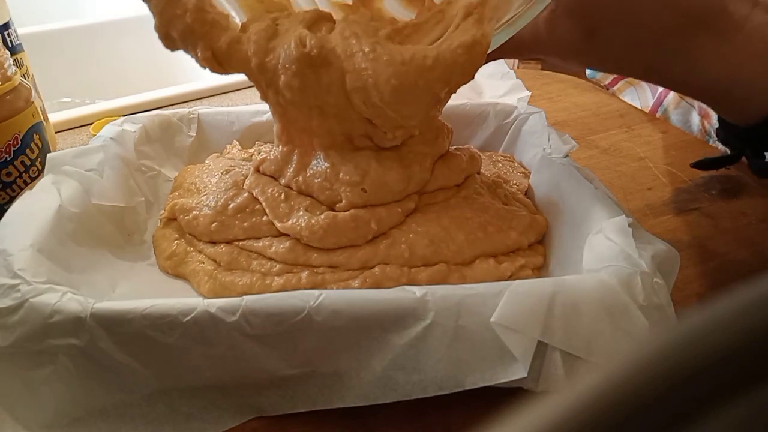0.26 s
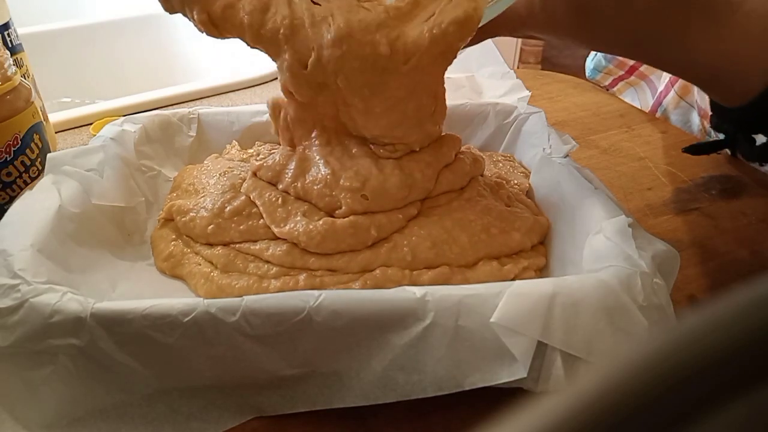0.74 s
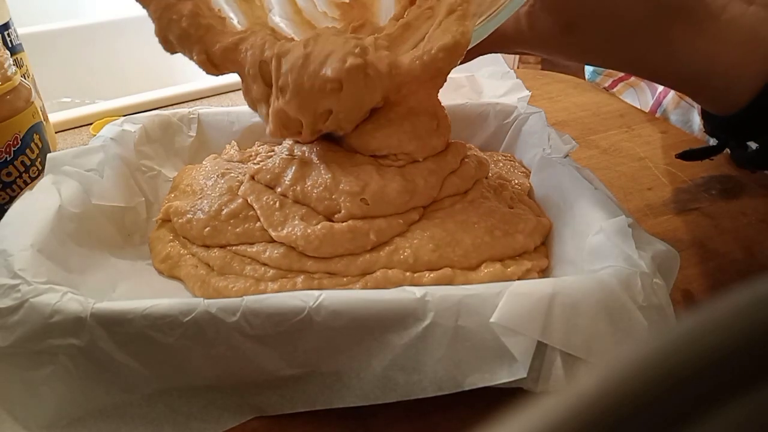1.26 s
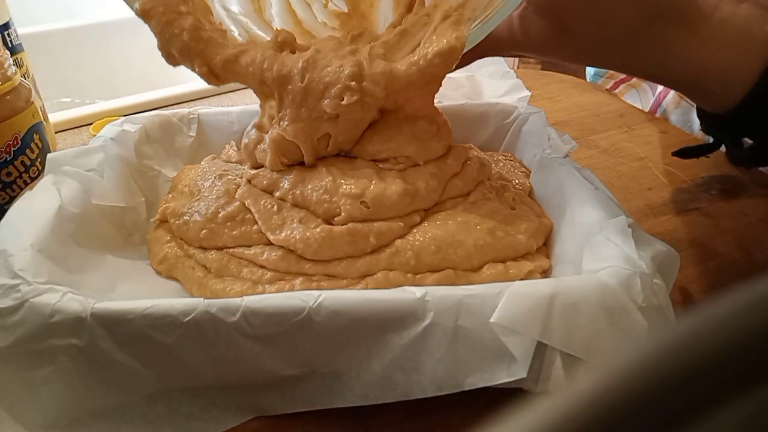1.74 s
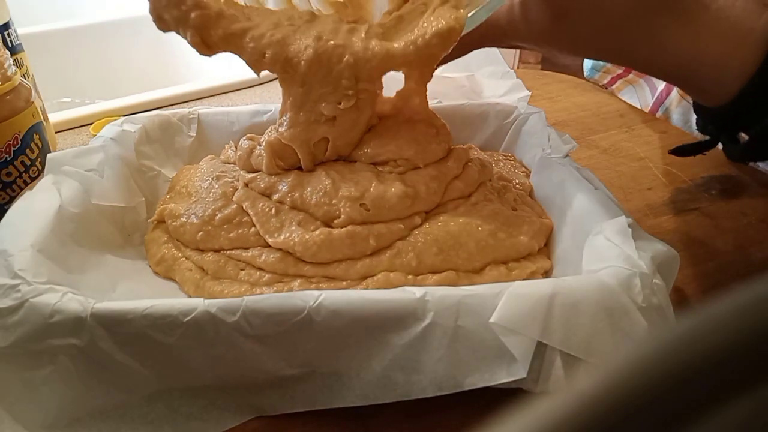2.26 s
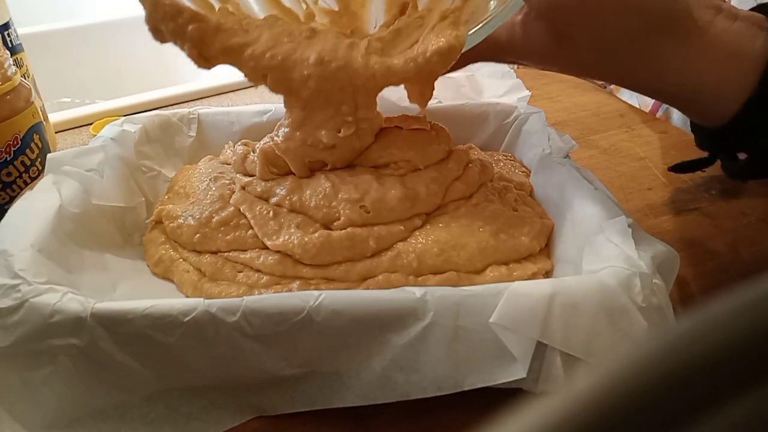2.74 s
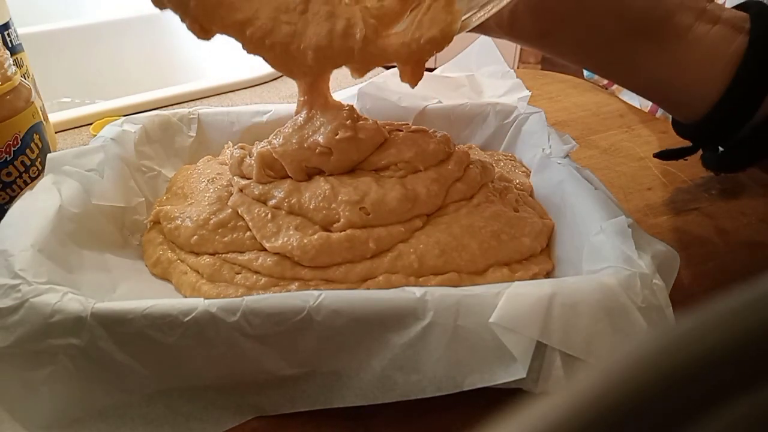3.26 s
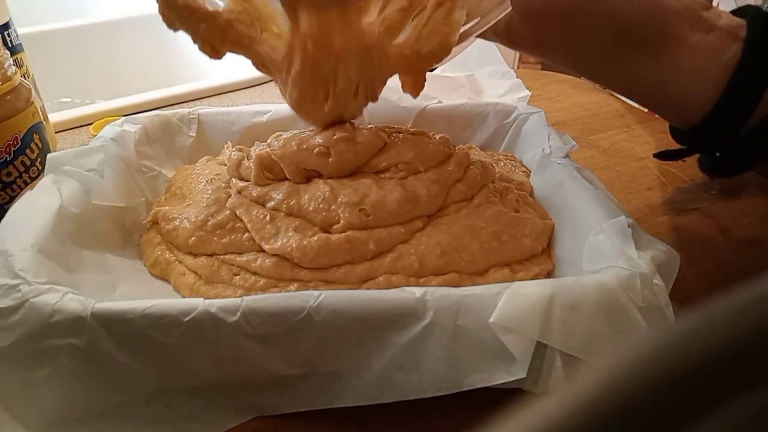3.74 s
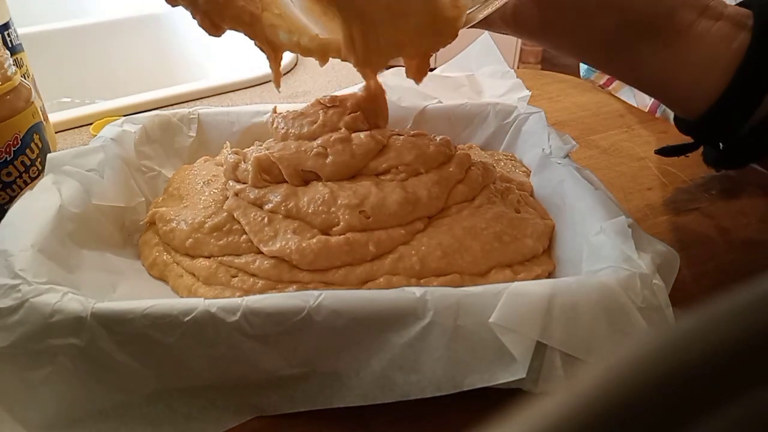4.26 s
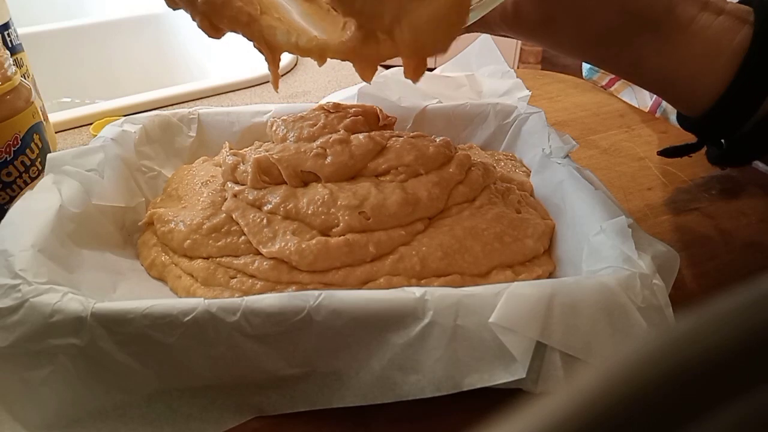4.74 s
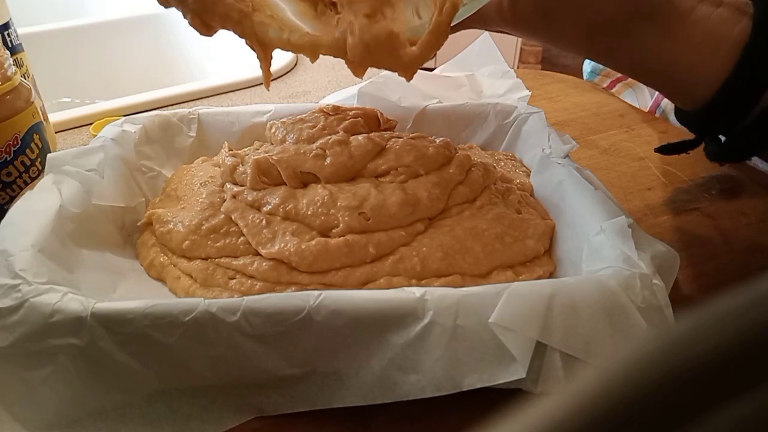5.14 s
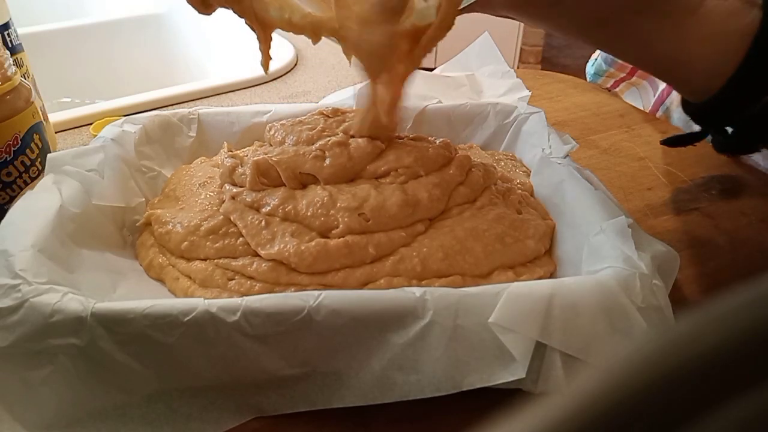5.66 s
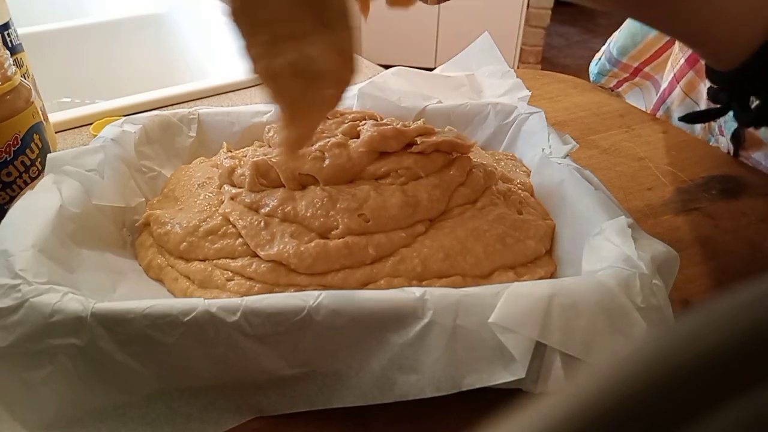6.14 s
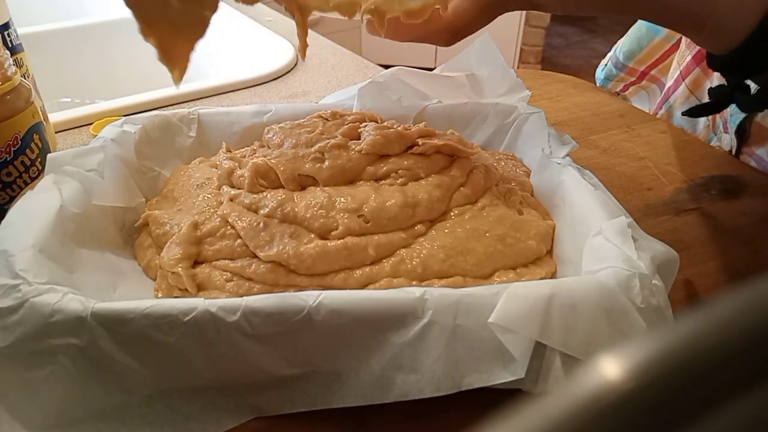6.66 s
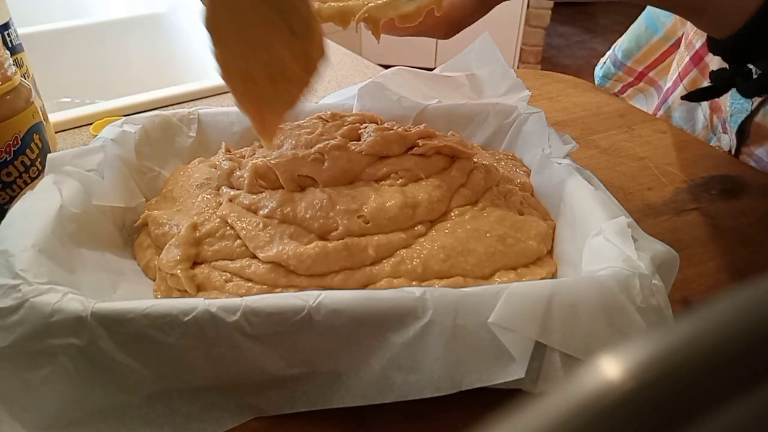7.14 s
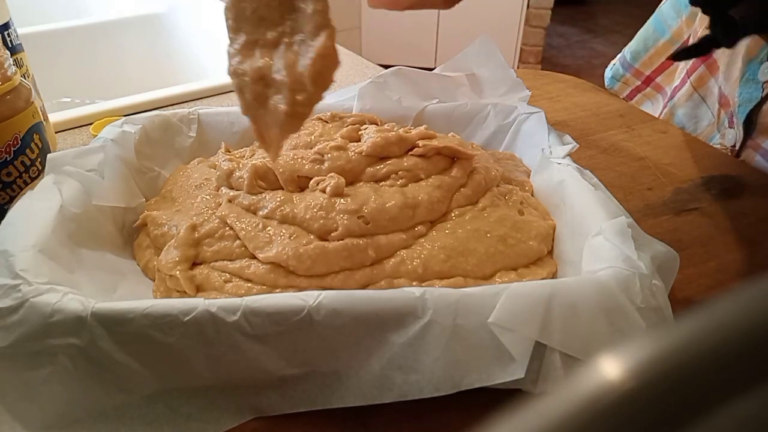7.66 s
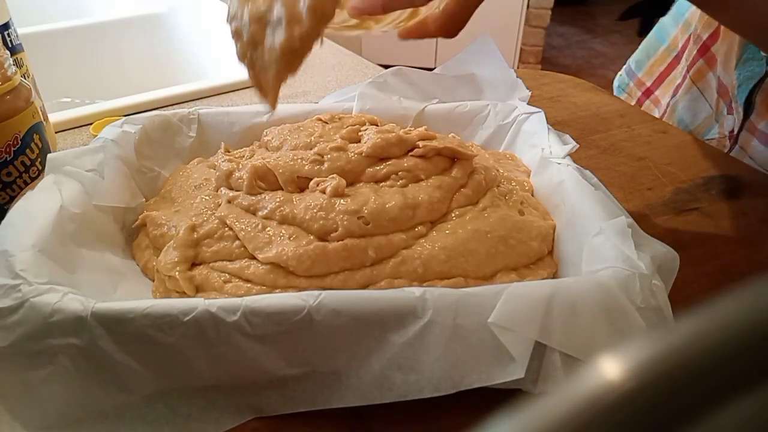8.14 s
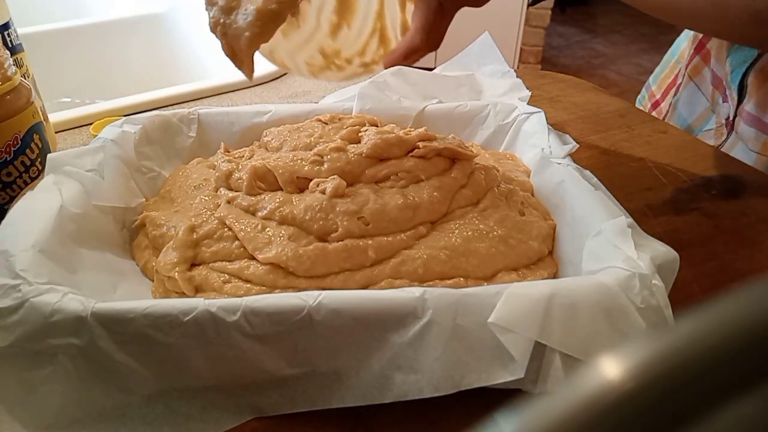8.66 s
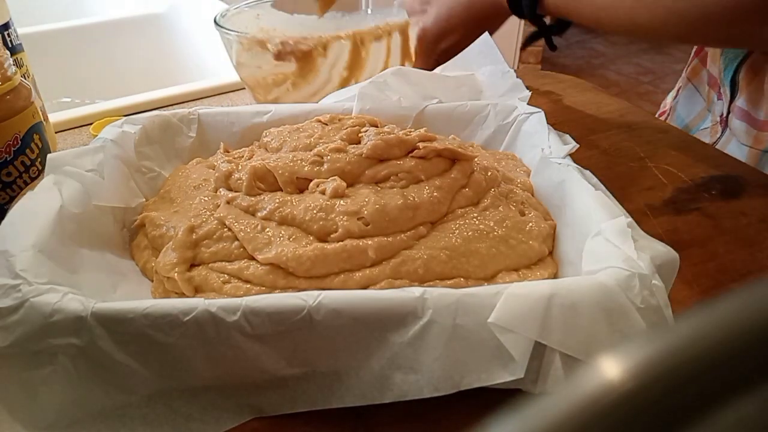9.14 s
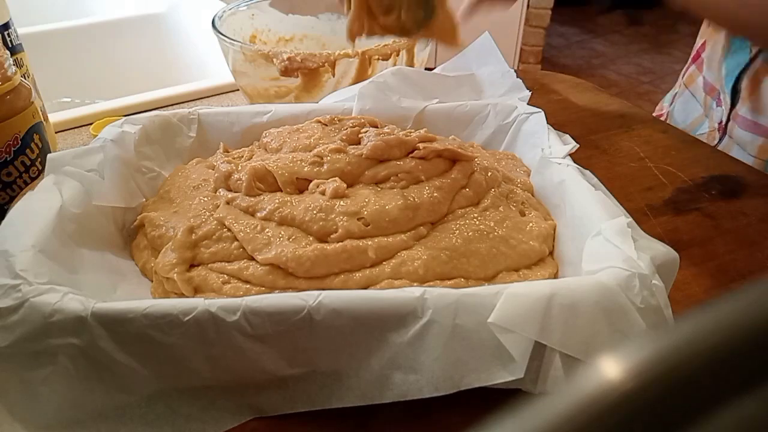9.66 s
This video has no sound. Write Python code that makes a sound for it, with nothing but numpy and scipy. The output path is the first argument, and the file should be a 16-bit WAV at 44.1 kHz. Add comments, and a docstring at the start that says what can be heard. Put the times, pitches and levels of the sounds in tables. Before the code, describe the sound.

A small kitchen heard very close, with quiet air and a faint wavering hum. For the first 2.3 seconds there are only barely audible taps, soft sliding batter, brief wet smears and small ticks of bursting air pockets. A bright wet tick comes at 2.5, then sharp spatula clicks on glass at 2.8 and 3.0, their ringing short and damped by batter. More firm clacks follow at 3.7, 4.0, 4.3 and 4.6, the strongest and brightest at 5.1, with short squelches and tiny squeaks between. Another click sounds at 6.0, then fingers rub the glass softly around 6.3. Faint dull taps and a smear come near 7.0, then near quiet. At 9.1 the bowl lands on a wooden table with a loud, low thud and brief roll; weaker knocks at 9.3 to 9.4 and a tiny one at 9.5 settle it, before a barely audible rustle at 9.7.

```python
"""First a faint appliance hum and softly sliding batter; then a spatula clicks on the glass bowl held in one hand.
It scrapes thick batter into a paper-lined pan: clicks are filtered noise plus the bowl's short, damped ringing.
Between them the batter smears, squelches and crackles, made of random pops and small squeaks, and air pockets tick.
The fingers shift their grip; the bowl is set down on a wooden table and rocks to rest: thuds, rolling noise, a rustle.
Echoes of a small kitchen surround these sounds; still air is quiet noise and the hum is wavering sine tones."""
import sys
import numpy as np
from scipy import signal
from scipy.fft import rfft, irfft, next_fast_len
from scipy.io import wavfile
from scipy.ndimage import uniform_filter1d, map_coordinates

SR = 44100
rng = np.random.default_rng(int(sys.argv[2]) if len(sys.argv) > 2 else 0)


def log_audio(samples):
    """Write samples as a 16-bit WAV file to the path given in sys.argv[1]."""
    # one column per channel
    frames = np.atleast_2d(samples).T
    # limit to full scale, then quantise
    limited = np.clip(frames, -1, 1)
    pcm = np.round(limited * 32767).astype(np.int16)
    wavfile.write(sys.argv[1], SR, pcm)


N = 436590  # length in samples

# Spatula hits on the glass: t/s, level/dB, bite over body level/dB, place (0 rim - 1 wall), favoured mode f/Hz
CONTACTS = [(0.2906, -52, -13, 0.019, 590), (0.3657, -53.5, -16, 0, 590), (0.769, -45, -3, 0.16, 3530),
            (1.4861, -51.5, -2.5, 0.11, 1370), (1.9203, -51, 2, 0.5, 2900), (2.4266, -43.5, -4, 0.057, 590),
            (2.5077, -49, 8, 0.0033, 3500), (2.7715, -22, -0.5, 0.0, 3600), (2.8564, -35, -9.5, 0.03, 600),
            (2.9581, -24, -0.5, 0.072, 6930), (3.352, -55.5, -1, 0.03, 591), (3.7261, -28, 9, 0.77, 1950),
            (4.0392, -27.5, 0.5, 0.067, 594), (4.2774, -26, 3.5, 0.9, 1100), (4.578, -26, -1, 0.08, 595),
            (5.1382, -19.5, 7, 0.5, 3380), (6.01, -28.5, 0.5, 0.62, 1370), (6.9602, -42, -14.5, 0.75, 1085),
            (7.0247, -52.5, -13, 0.47, 1085)]
# Bands of a click, in the order knock, body, bite, shine: lowest f/Hz, highest f/Hz
CLICK_BANDS = [(90, 350), (400, 1600), (1600, 4500), (5000, 15000)]
# Ringing modes of the coated bowl with the spatula against it: f/Hz, t60/s, rim level/dB, wall level/dB
BOWL_MODES = [(135.76, 0.074, -8.5, -22.5), (193, 0.078, -6, -16.5), (481, 0.042, -3.5, -3.5),
              (591, 0.14, -10.5, -21), (620, 0.019, 4.5, -9.5), (719, 0.046, -10.5, -9),
              (909, 0.039, -6, -11), (1089, 0.069, -9.5, 1.5), (1280, 0.027, -5, -14),
              (1384, .04, -8.5, -2), (1480, 0.018, -2, -15.5), (1925, 0.06, -14.5, 3.5),
              (2260, 0.027, -8, -13), (2820, 0.023, -7.5, -6.5), (2982, 0.041, -13.5, -1),
              (3227, 0.021, 3, -0.5), (3405, 0.029, 0.5, -0.5), (3580, .025, -1, -8.5),
              (3748, 0.056, -16, -14.5), (4344, 0.036, -13, -20), (5760, .04, -24, -10.5),
              (6530, 0.017, -9.5, -29), (6900, 0.035, -4.5, -22.5), (7690, 0.034, -17.5, -11.5),
              (7800, 0.019, -18, -16), (9280, 0.019, -18.5, -32.5)]
# Colour of the dry crack of a contact: f/Hz, level/dB per Hz
CRACK_COLOUR = [(50, -25.5), (150, -9), (320, -20.5), (550, -1.5), (1400, 3), (1750, -1.5), (3300, 5.5),
                (4900, -12), (7000, -1.5), (9500, -12.5), (12000, -17), (15500, -18.5)]
# Larger air pockets bursting in the batter: t/s, peak level/dB, tilt/dB per octave
POCKETS = [(0.7414, -35, 0), (0.8567, -38.5, -1.5), (0.9407, -26.5, -3), (1.8441, -35, -7.5),
           (2.0223, -36.5, 0), (2.3499, -26, 1.5), (2.474, -18.5, 4.5), (3.1534, -42, -4), (3.195, -32, 0),
           (3.3496, -35, 4.5), (3.449, -38, -4), (5.5566, -40, 0), (5.5637, -37.5, -1.5), (6.7051, -37, -3)]
# Colour of such a burst: f/Hz, level/dB per Hz
BURST_COLOUR = [(100, -18), (700, -19.5), (1700, -2), (3300, 7), (4900, -13), (7000, -1.5), (9500, -13.5),
                (12000, -19.5), (15500, -10.5)]
# Dull, low bumps under two of the clicks: t/s, level/dB before the soft start
BUMPS = [(2.429, -38.5), (3.352, -37.5)]
# Wet strokes of the blade, and at the end a faint rustle of handling:
# start t/s, length/s, squelch level/dB before trim, crackle over squelch level/dB before trim
STROKES = [(0.298, 0.033, -60, -0.5), (0.344, 0.12, -59.5, -6), (0.89, 0.15, -62, -3.5),
           (1.038, 0.055, -51, -19), (1.508, 0.15, -57.5, -12.5), (2.039, .065, -43, -14.5),
           (2.317, 0.02, -52.5, -13), (3.381, 0.14, -56, -10.5), (3.649, 0.12, -50, -25),
           (4.159, 0.037, -60.5, 5.5), (4.234, 0.049, -45, -19), (4.785, 0.064, -42, -24.5),
           (5.307, 0.044, -42, -20), (7.028, 0.16, -58.5, -8), (9.69, 0.21, -76, 0.5)]
# Resonances of the bowl under the moving blade: f/Hz, width/Hz, level/dB
SQUELCH_MODES = [(1140, 88, -4.5), (1330, 210, -2), (1890, 160, -0.5), (2340, 57, -9), (2850, 180, -4.5),
                 (3370, 160, -2.5), (3920, 320, -9.5)]
# Colour of the crackling batter: f/Hz, level/dB per Hz
CRACKLE_COLOUR = [(2000, -27.5), (5000, -12), (7200, 5.5), (9500, -11.5), (12000, -19), (15500, -25.5)]
# How hard the hands work the bowl: t/s, level/dB
EFFORT = [(0, -65), (1.1, -61), (1.35, -68), (2.5, -60.5), (3.3, -64.5), (5.05, -62), (5.8, -71),
          (6.25, -59.5), (7.3, -68), (7.7, -73), (8.7, -75.5), (9.0, -67.5), (9.85, -64.5)]
# Colour of the sliding batter: f/Hz, level/dB per Hz
SMEAR_COLOUR = [(150, -12), (300, 0.5), (500, 5), (750, 11), (1000, 4.5), (1600, -6.5), (2500, -13),
                (3400, -11.5), (5000, -33.5), (7200, -40.5), (10000, -34.5), (15500, -33)]
# Colour of the rumbling hands: f/Hz, level/dB per Hz
RUMBLE_COLOUR = [(20, -24), (45, -7), (75, 4.5), (150, 4.5), (250, -11), (500, -24), (1500, -53.5)]
# Bowl resonances rung by the rubbing fingers: f/Hz, width/Hz, level/dB
GRIP_MODES = [(594, 18, 9.5), (828, 92, -7.5), (1150, 66, -8), (1336, 24, 1), (1728, 170, -13.5),
              (3120, 530, -25)]
# The bowl landing and rocking: t/s, rms level/dB, hardness f/Hz, ring of the table top level/dB
LANDINGS = [(9.0686, -9.5, 1024, -4), (9.0815, -18, 496, -9.5), (9.095, -25, 2460, -20),
            (9.319, -20.5, 640, -17.5), (9.3595, -28, 550, -2), (9.388, -28.5, 350, 0.5),
            (9.528, -43.5, 170, -18)]
# Ringing modes of the wooden table top: f/Hz, t60/s, level/dB
TABLE_MODES = [(190, .24, 3), (237, .12, -8), (273, .18, -3), (353, .15, -4), (489, .17, -1),
               (565, .14, -13), (696, .14, -12), (768, .16, -9), (859, .13, -11)]
# Colour of the landing thud: f/Hz, level/dB per Hz
THUD_COLOUR = [(25, -38.5), (60, -22.5), (120, -5.5), (220, 7), (450, 1), (800, -2), (1100, -10.5),
               (1800, -14), (3600, -20), (4900, -39), (7000, -25), (10000, -44.5), (15500, -42)]
# Colour of the foot rolling on wood: f/Hz, level/dB per Hz
ROLL_COLOUR = [(50, -11.5), (120, 4.5), (260, 1), (340, 0), (440, -10), (900, -8.5), (1800, -20),
               (3600, -27.5), (5000, -63.5)]
# Colour of the still kitchen air: f/Hz, level/dB per Hz
AIR_COLOUR = [(25, -22.5), (45, -13), (72, -2), (150, -3), (330, -5.5), (800, -3), (1000, -15.5),
              (1250, -7.5), (2400, -16.5), (3200, -14), (5000, -37.5), (7200, -29), (9500, -38),
              (15500, -34)]
# Tones of the appliance hum: f/Hz, rms level/dB before wavering
HUM = [(145.3, -72.5), (586.8, -84), (689.1, -81), (899, -80.5), (1340, -74.5), (3112, -89), (6137, -103)]
# How long the kitchen's echoes last: f/Hz, t60/s
ROOM_DECAY = [(100, .5), (500, 0.37), (1500, .44), (3300, 0.35), (7000, 0.36), (15000, 0.11)]

# low knock against the body on the rim, and its change on the wall
KNOCK_DB, WALL_KNOCK_DB = -7, -18
# level of a blow that shines fully; dB of shine per dB of force; change on the coated wall
FIRM_DB, SHINE_GROWS, WALL_SHINE_DB = -22, 0.42, -12
# how much, and how narrowly, the point of contact favours its modes
FAVOUR_DB, FAVOUR_OCTAVES = 7, 0.07
# squeaks as the blade sticks and slips: spacing, length, pitch, pitch scatter, peak over the squelch column
SLIP_EVERY_S, SLIP_S, SLIP_HZ, SLIP_OCTAVES, SLIP_DB = 0.016, 0.013, 3200, 0.11, 4
# rumble of the hands and faint crackle of the batter, against the smear
RUMBLE_DB, FIZZ_DB = -4, -25.5
# fingers slide on the bowl once as the grip changes
GRIP_START_S, GRIP_RISE_S, GRIP_HOLD_S, GRIP_FALL_DB_PER_S = 6.315, 0.038, 0.06, 130
GRIP_DB, GRIP_RUMBLE_DB, GRIP_JUDDER_DB = -46, -54, 3.5
# the foot rolls on the wood after the first blow, then ever more weakly
ROLL_START_S, ROLL_RISE_S, ROLL_HOLD_S, ROLL_FALL_DB_PER_S, ROLL_DB = 9.1, 0.065, 0.043, 63, -30
TOP_HZ = 15700  # upper band limit of the finished sound


def clicks(crack_db=-3, wall_crack_db=-5, crack_t60=0.022, attack=0.0017, scatter_db=2.5, sideways_db=-6,
           bass_hz=95):
    """Each hit cracks and briefly rings the bowl; the place struck picks the modes, and the coated wall cracks less."""
    out = np.zeros(N)
    t = np.arange(2 * SR // 5) / SR
    hz, t60, rim_db, wall_db = np.transpose(BOWL_MODES)[:, :, None]
    fade = amp(-60 * t / t60)
    rise = 1 - np.exp(-(t / attack) ** 2)
    for s, db, tilt_db, place, favoured_hz in CONTACTS:
        band_db = contact_bands(db, tilt_db, place)
        strength, phase = rng.standard_normal((2, len(BOWL_MODES), 1))
        mode_db = rim_db + np.clip(place, 0, 1) * (wall_db - rim_db) + scatter_db * strength
        octaves_off = np.log2(hz / favoured_hz)
        mode_db = mode_db + FAVOUR_DB * np.exp(-(octaves_off / FAVOUR_OCTAVES) ** 2)
        ring = (amp(mode_db) * fade * np.sin(2 * np.pi * (hz * t + phase))).sum(0)
        crack_gain = 2 * amp(crack_db + wall_crack_db * place ** 2 - 60 * t / crack_t60)
        crack = crack_gain * shaped(rng.standard_normal(len(t)), CRACK_COLOUR)
        direct = weighted(rise * (ring + crack), band_db)
        # summed over all directions, single modes stand out less
        around = weighted(rise * (amp(sideways_db) * ring + crack), band_db)
        echoes = in_room(around, wet_db=-12.5, wall_db=-23.5) - around
        add(out, s, direct + echoes)
    # a small bowl radiates no deep bass
    return coloured(out, lambda f: 1 / np.sqrt(1 + (bass_hz / (f + 1)) ** 6))


def contact_bands(db, tilt_db, place):
    """Levels of four bands: the rim knocks and shines more than the wall, and firm blows are brighter."""
    body, bite = db - tilt_db / 2, db + tilt_db / 2
    knock = body + KNOCK_DB + WALL_KNOCK_DB * np.sqrt(np.clip(place, 0, 1))
    shine = db + SHINE_GROWS * (db - FIRM_DB) + WALL_SHINE_DB * place
    return knock, body, bite, shine


def weighted(click, band_db):
    """Tilt a click, twice over, to bring its first 20 ms to the given level in each band."""
    size = SR // 50
    hz = np.fft.rfftfreq(4 * size, 1 / SR)
    for _ in range(2):
        power = np.abs(rfft(click[:size], 4 * size)) ** 2 / (2 * size ** 2)
        tilt = []
        for (lo, hi), db in zip(CLICK_BANDS, band_db):
            present_db = 10 * np.log10(power[(hz > lo) & (hz < hi)].sum())
            tilt.append((np.sqrt(lo * hi), db - present_db))
        click = coloured(click, lambda f: amp(along(tilt, f)))
    return click


def scraping(clump_db=3.5, slip_scatter_db=3):
    """Batter squeezed in fits squelches, rings the bowl, crackles and squeaks; the faint last rustle is made alike."""
    out = np.zeros(N)
    fits = amp(clump_db * wobble(170))
    squelch = resonant(fits * pops(rate=8000, spread_db=1), SQUELCH_MODES, dull_hz=4300)
    crackle = shaped(fits * pops(rate=3500, spread_db=0), CRACKLE_COLOUR)
    for start, length, db, crackle_db in STROKES:
        span = slice(round(start * SR), round((start + max(length, 0.01)) * SR))
        swell = np.sqrt(np.hanning(len(out[span])))
        wet = amp(db - 6.0) * unit(swell * squelch[span])  # both levels are trimmed
        crisp = amp(db + crackle_db - 3.5) * unit(swell * crackle[span])
        add(out, start, wet + crisp)
        for k, (late, sharp, strong) in enumerate(rng.standard_normal(size=(6, 3))):
            after = SLIP_EVERY_S * (k + 0.5 + 0.25 * late)
            pressure = np.sin(np.pi * np.clip(after / length, 0, 1))  # greatest midway
            slip_gain = pressure * amp(db + SLIP_DB + slip_scatter_db * strong)
            slip_hz = SLIP_HZ * 2 ** (SLIP_OCTAVES * sharp)
            add(out, start + after - SLIP_S / 2, slip_gain * squeak(slip_hz))
    return in_room(out, wet_db=-10.5)


def squeak(hz, rough=0.4):
    """One slip: a short tone, its pitch roughened by uneven grip."""
    swell = np.hanning(round(SLIP_S * SR))
    grip = uniform_filter1d(rng.standard_normal(SR // 10), size=16)[:len(swell)]
    return swell * np.sin(2 * np.pi * np.cumsum(hz * (1 + rough * grip)) / SR)


def pops(rate, spread_db):
    """Tiny air pockets bursting at random, rate a second; with a spread, a few are much larger than the rest."""
    bursting = rng.random(N) < rate / SR
    size_db = spread_db * np.minimum(rng.exponential(size=N), 4)
    return bursting * rng.standard_normal(N) * amp(size_db)


def pockets(t60=0.026):
    """Larger air pockets burst with a bright wet tick of fading noise that leaves the glass silent."""
    out = np.zeros(N)
    t = np.arange(SR // 10) / SR
    for s, db, tilt_db in POCKETS:
        puff = rng.standard_normal(len(t)) * amp(-60 * t / t60) * (1 - np.exp(-t / 0.00022))
        tick = coloured(puff, lambda hz: amp(
            along(BURST_COLOUR, hz) + tilt_db * np.log2(np.maximum(hz, 500) / 4000)))
        add(out, s, amp(db) * tick / np.abs(tick).max())
    return in_room(out, wet_db=-13)


def set_down(ping_hz=8263, ping_db=-49, thud_t60=0.044, table_db=-8, bass_hz=75):
    """The bowl's foot thuds on the table top and rolls between bounces; the first blow makes the glass ping faintly."""
    out = np.zeros(N)
    t = np.arange(SR // 2) / SR
    table = sum(amp(db - 60 * t / t60) * np.sin(2 * np.pi * hz * t) for hz, t60, db in TABLE_MODES)
    for s, db, hard_hz, ring_db in LANDINGS:
        thud = amp(-60 * t / thud_t60) * shaped(rng.standard_normal(len(t)), THUD_COLOUR)
        blow = (thud + amp(table_db + ring_db) * table) * (1 - np.exp(-t / 0.0013))
        # a softer contact is duller
        blow = coloured(blow, lambda hz: 1 / np.sqrt(1 + (hz / hard_hz) ** 2))
        add(out, s, amp(db) * blow / blow[:SR // 50].std())  # the level holds for the first 20 ms
    ping_gain = amp(ping_db - 60 * t / 0.25) * (1 - np.exp(-t / 0.0047))
    add(out, LANDINGS[0][0], ping_gain * np.sin(2 * np.pi * ping_hz * t))
    rolling = envelope(ROLL_START_S, ROLL_RISE_S, ROLL_HOLD_S, ROLL_FALL_DB_PER_S)
    roll = amp(ROLL_DB) * rolling * shaped(rng.standard_normal(N), ROLL_COLOUR)
    # the table radiates little deep bass
    thuds = coloured(out, lambda hz: 1 / np.sqrt(1 + (bass_hz / (hz + 1)) ** 4))
    return in_room(thuds, wet_db=-6.5) + roll


def bumps(hz=150, t60=0.059):
    """Soft bumps under two of the clicks: a few low, fading cycles with a gentle start."""
    out = np.zeros(N)
    t = np.arange(SR // 5) / SR
    for s, db in BUMPS:
        gain = amp(db - 60 * t / t60) * (1 - np.exp(-t / 0.002))
        add(out, s, gain * np.sin(2 * np.pi * hz * t))
    return in_room(out, wet_db=-12.5)


def handling():
    """With the effort, batter slides and crackles softly and the hands rumble; fingers rub the glass as the grip changes."""
    effort_db, = curves(EFFORT)
    grip = envelope(GRIP_START_S, GRIP_RISE_S, GRIP_HOLD_S, GRIP_FALL_DB_PER_S)
    smear = amp(effort_db + 1.5 * wobble(8.2)) * shaped(pops(rate=1100, spread_db=1.5), SMEAR_COLOUR)
    fizz_gain = amp(effort_db + FIZZ_DB + 3 * wobble(9.7))
    fizz = fizz_gain * shaped(pops(rate=290, spread_db=4), CRACKLE_COLOUR)
    rumble_gain = (amp(effort_db + RUMBLE_DB) + amp(GRIP_RUMBLE_DB) * grip) * amp(2 * wobble(7.6))
    rumble = rumble_gain * shaped(rng.standard_normal(N), RUMBLE_COLOUR)
    judder = amp(GRIP_JUDDER_DB * wobble(45))
    rubbed_glass = resonant(rng.standard_normal(N), GRIP_MODES, dull_hz=3600)
    rub = amp(GRIP_DB) * grip * unit(judder * rubbed_glass)
    return in_room(smear + fizz + rub, wet_db=-5) + rumble


def kitchen():
    """Still air is coloured noise; the appliance hums in tones that waver in level and phase."""
    t = np.arange(N) / SR
    hum = np.zeros(N)
    for hz, db in HUM:
        waver = amp(2 * wobble(2) + 2.8 * wobble(9))
        tone = np.sqrt(2) * np.sin(2 * np.pi * hz * t + 1.7 * wobble(13))
        hum += amp(db) * waver * tone
    return hum + amp(-65.0) * shaped(rng.standard_normal(N), AIR_COLOUR)


def in_room(x, wet_db, wall_db=-20, dull_hz=13000):
    """x plus one wall's echo and a fresh diffuse tail: noise that fades at its own pace in each band."""
    hz, t, z = signal.stft(rng.standard_normal(SR // 2), SR, nperseg=256)
    fade = amp(-60 * t / along(ROOM_DECAY, hz)[:, None])
    tail = signal.istft(z * fade, SR, nperseg=256)[1]
    tail *= 1 - np.exp(-(np.arange(len(tail)) / SR / 0.0026) ** 2)
    tail = coloured(tail, lambda f: 1 / np.sqrt(1 + (f / dull_hz) ** 4))  # far surfaces dull the top
    answer = amp(wet_db) * tail / np.linalg.norm(tail)
    answer[0] += 1  # the direct sound
    answer[round(0.0275 * SR)] += amp(wall_db)
    return signal.fftconvolve(x, answer)[:len(x)]


def resonant(x, modes, dull_hz):
    """x through (Hz, width, dB) resonances and a low-pass, at rms 1."""
    def gain(f):
        power = sum(amp(db) ** 2 / (1 + ((f * f - hz * hz) / (width * (f + 1))) ** 2)
                    for hz, width, db in modes)
        return np.sqrt(power / (1 + (f / dull_hz) ** 12))
    return unit(coloured(x, gain))


def shaped(x, spectrum):
    """x with a (Hz, dB) colour, at rms 1."""
    return unit(coloured(x, lambda hz: amp(along(spectrum, hz))))


def coloured(x, gain):
    """x through the causal filter whose magnitude is gain(Hz)."""
    m = 2 * next_fast_len(len(x) // 2 + 2048)
    cepstrum = irfft(np.log(np.maximum(gain(np.fft.rfftfreq(m, 1 / SR)), 1e-6)))
    # folding the cepstrum forward makes the filter respond only after its input
    cepstrum[1:m // 2] *= 2
    cepstrum[m // 2 + 1:] = 0
    return irfft(rfft(x, m) * np.exp(rfft(cepstrum)), m)[:len(x)]


def envelope(start, rise, hold, fall_db_per_s):
    """Gain that rises, holds and dies away."""
    t = np.arange(N) / SR - start
    return np.clip(t / rise, 0, 1) * amp(-fall_db_per_s * np.maximum(t - rise - hold, 0))


def wobble(rate):
    """A smooth random curve, rate knots a second."""
    return map_coordinates(rng.standard_normal(4096), [np.arange(N) * rate / SR + 2], mode="mirror")


def curves(rows):
    """One value per sample for each column after the time."""
    s, *cols = np.transpose(rows)
    return [np.interp(np.arange(N) / SR, s, c) for c in cols]


def along(points, hz):
    """(Hz, value) points read on a log axis."""
    f, v = np.transpose(points)
    return np.interp(np.log(hz + 1), np.log(f + 1), v)


def add(track, s, sound):
    """Mix a sound into the track at s seconds."""
    part = track[round(s * SR):][:len(sound)]
    part += sound[:len(part)]


def amp(db):
    """Decibels to gain."""
    return 10 ** (np.asarray(db) / 20)


def unit(x):
    """Scale to rms 1."""
    return x / np.sqrt(np.mean(x ** 2) + 1e-20)


def scene():
    """All sources at one close microphone."""
    batter = scraping() + pockets()
    bowl = clicks() + set_down() + bumps()
    return (bowl + batter + handling() + kitchen())[None]


def record(dry, low_cut_hz=55):
    """The recorder thins the deep bass, rounds off the highest peaks and cuts steeply above its band limit."""
    thin = coloured(dry[0], lambda hz: 1 / np.sqrt(1 + (low_cut_hz / (hz + 1)) ** 4))[None]
    rounded = thin / (1 + np.abs(thin / 0.95) ** 6) ** (1 / 6)
    m = next_fast_len(N + SR // 2)
    passband = 1 / (1 + (np.fft.rfftfreq(m, 1 / SR) / TOP_HZ) ** 120)
    return irfft(rfft(rounded, m) * passband, m)[:, :N]


dry = scene()
out = record(dry)
log_audio(out)
```